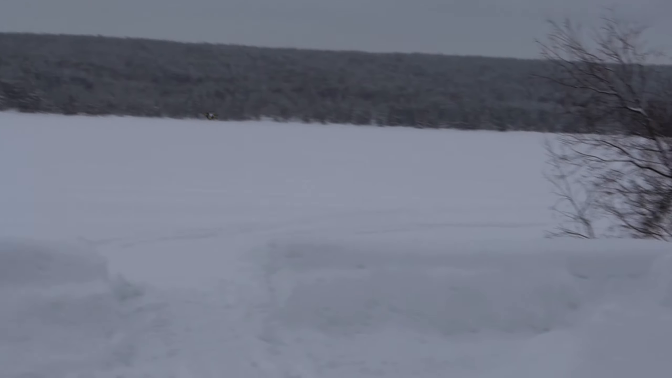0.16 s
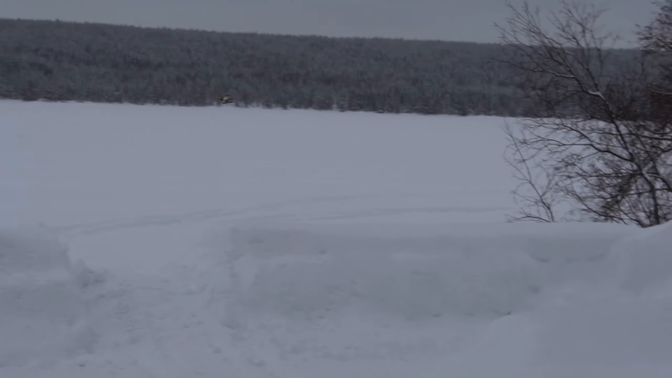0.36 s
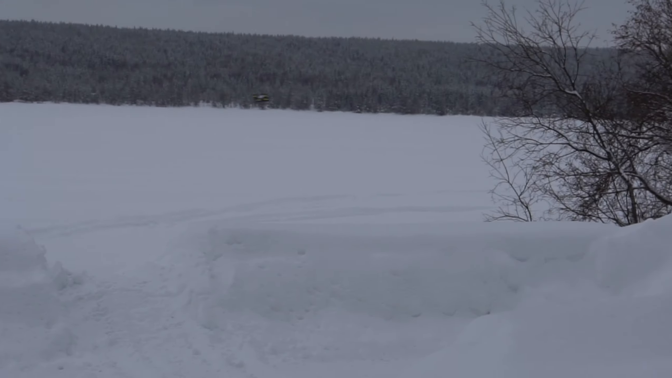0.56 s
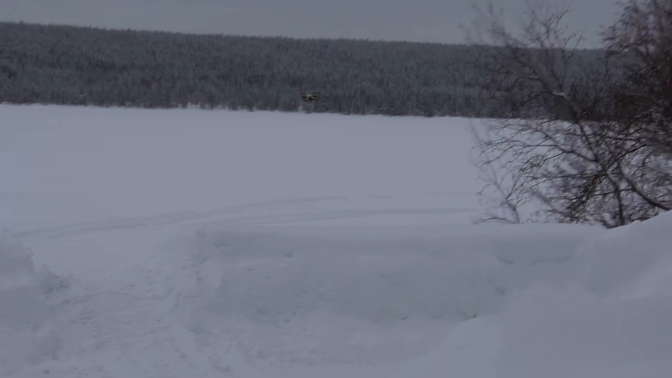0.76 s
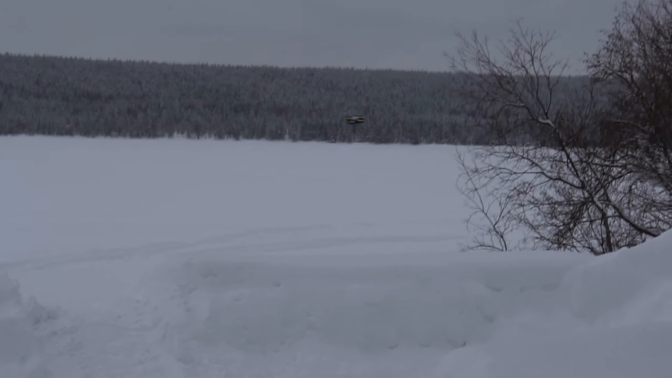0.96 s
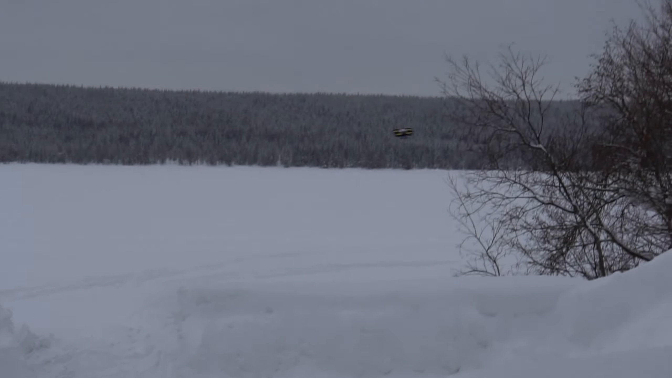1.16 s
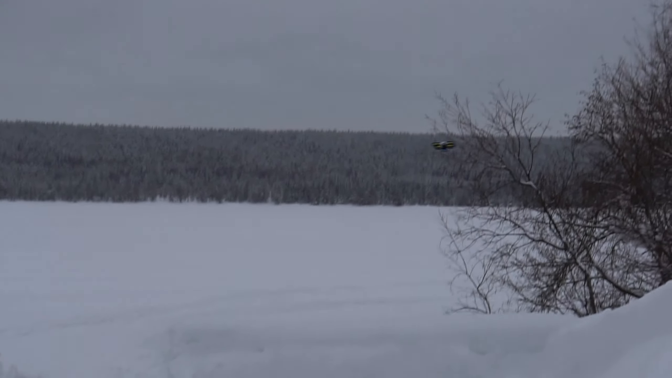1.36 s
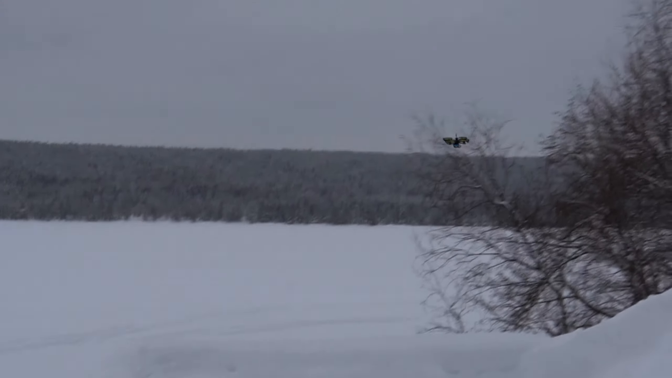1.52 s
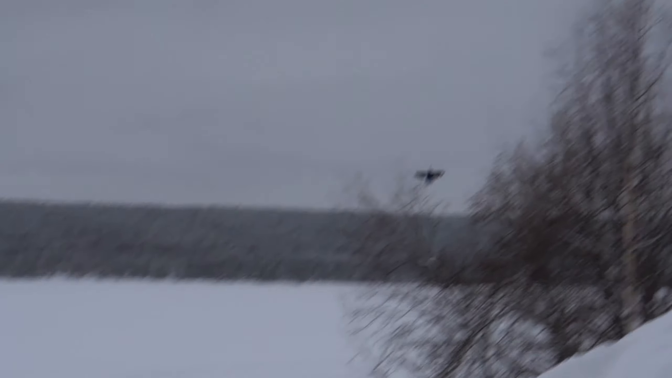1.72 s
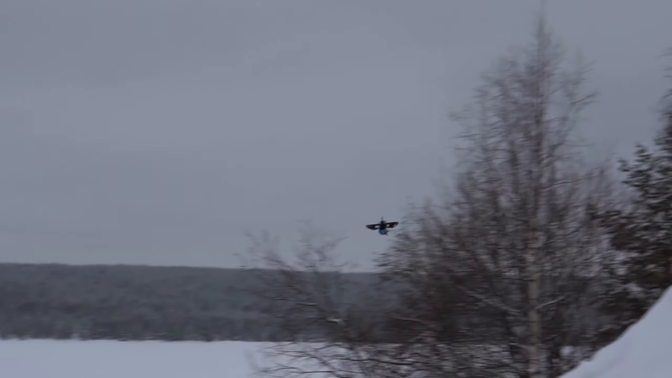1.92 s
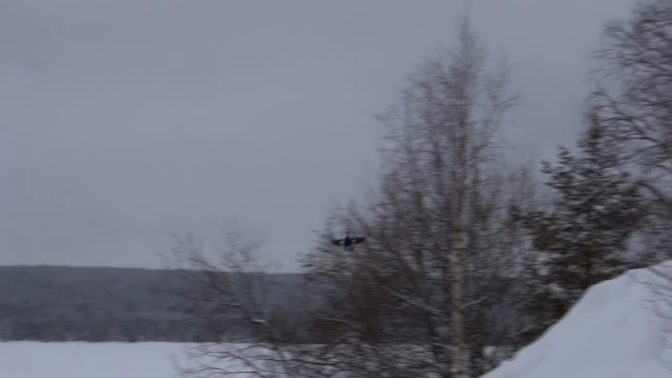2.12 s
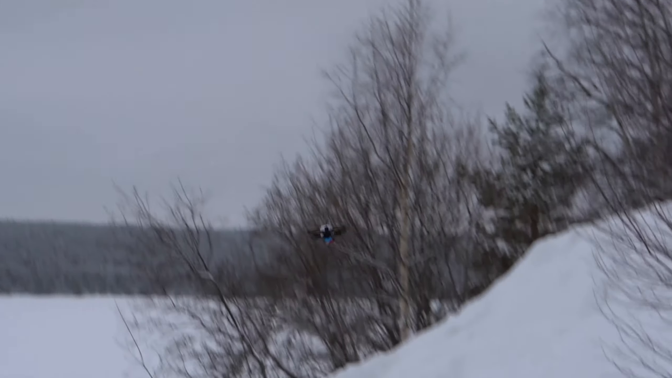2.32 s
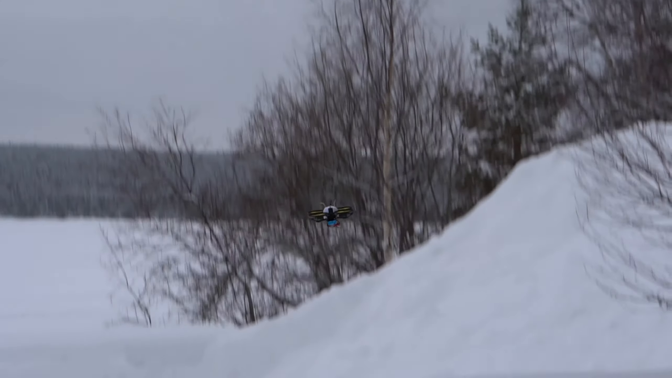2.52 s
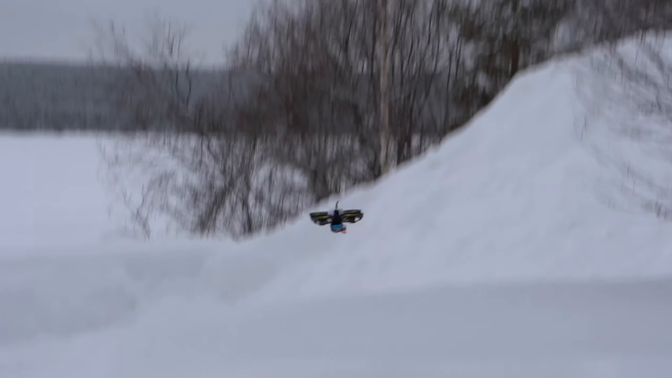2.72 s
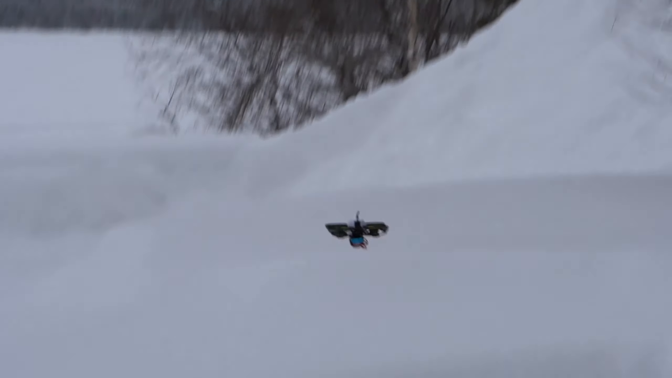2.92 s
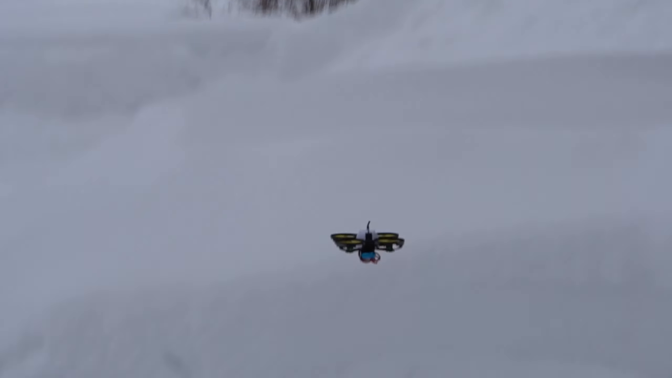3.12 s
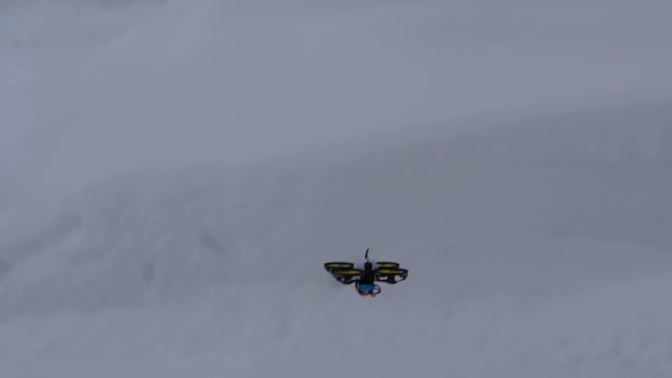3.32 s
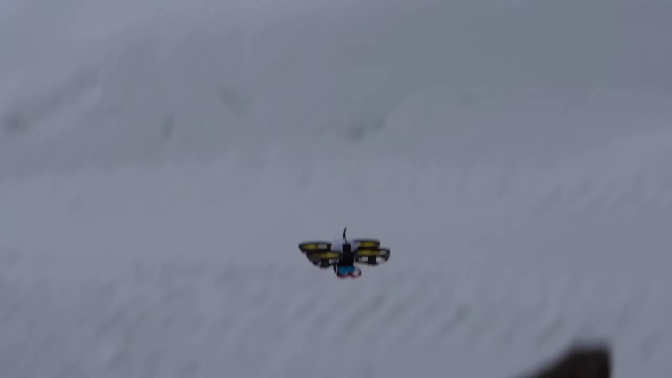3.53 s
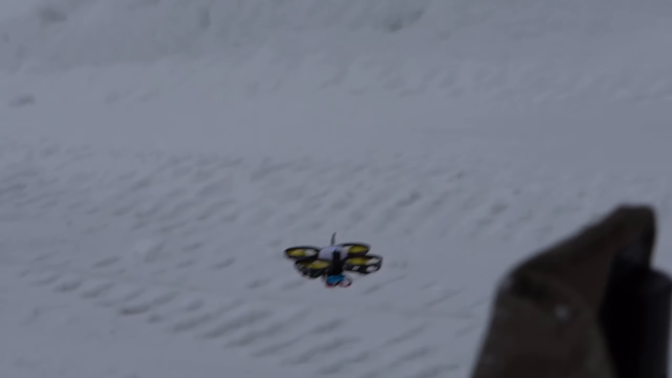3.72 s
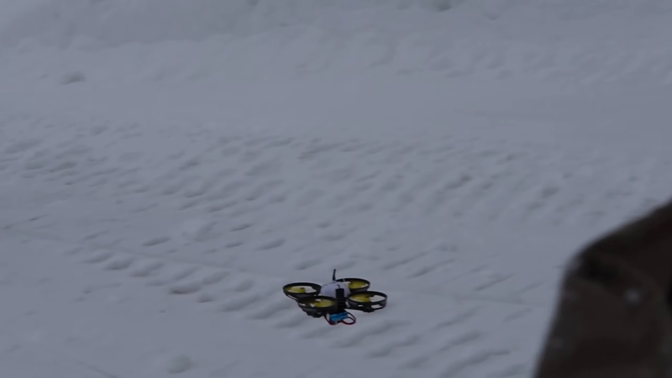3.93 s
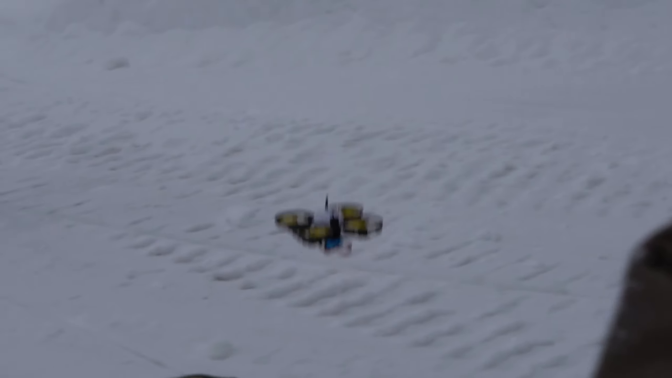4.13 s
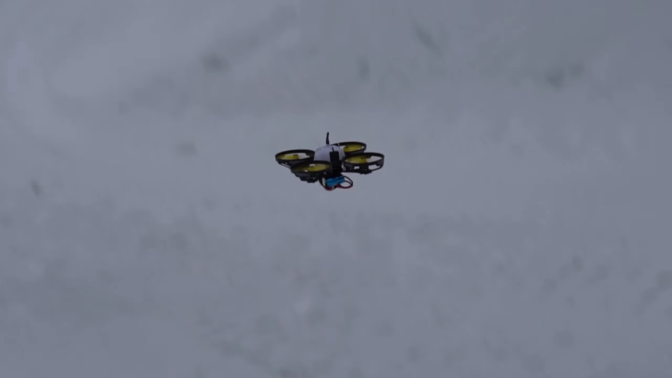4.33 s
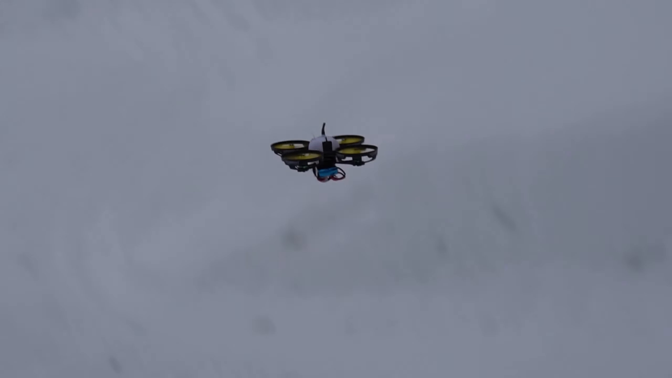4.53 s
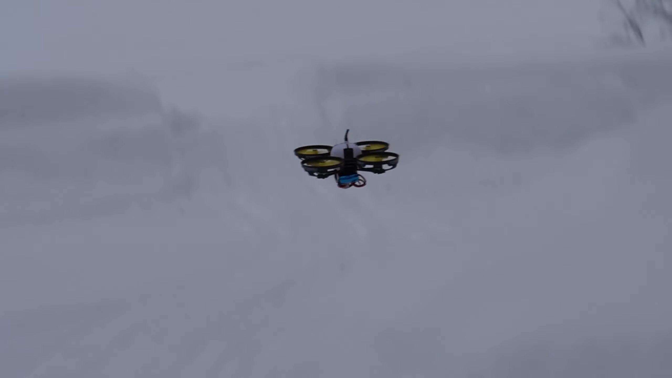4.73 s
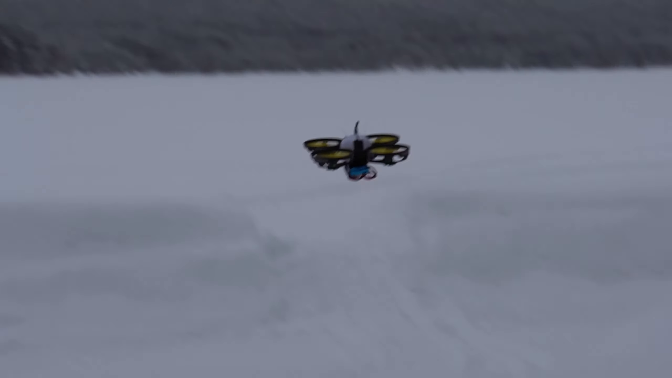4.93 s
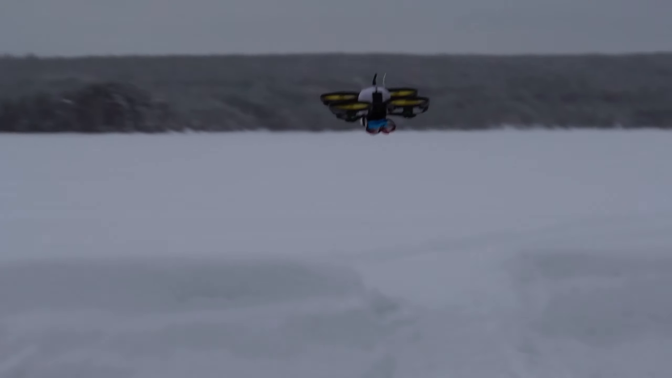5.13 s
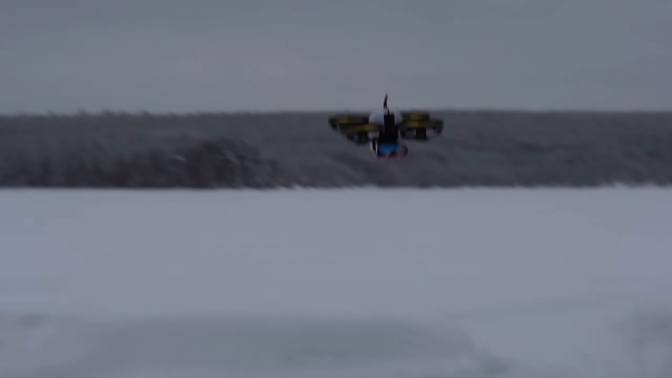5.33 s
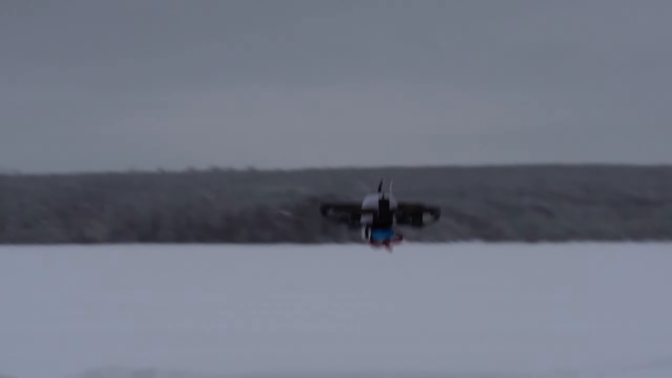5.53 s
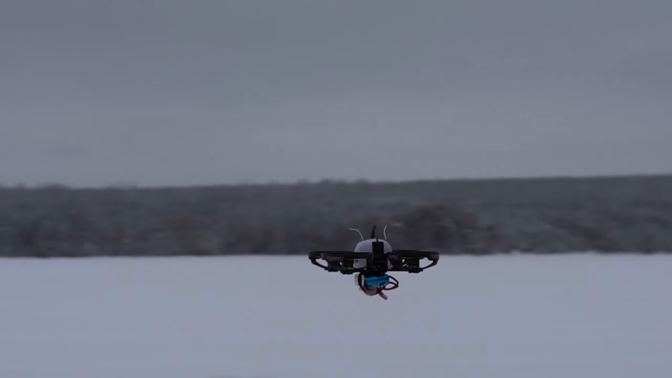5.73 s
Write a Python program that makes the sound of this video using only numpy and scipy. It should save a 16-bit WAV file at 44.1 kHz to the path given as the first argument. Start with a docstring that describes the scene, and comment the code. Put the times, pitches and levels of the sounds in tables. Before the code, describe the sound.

Continuous nasal drone buzz, starting high and somewhat distant, wavering downward, then nearing by three seconds. Close by, the rotors rev up into a bright, hissing peak, ease down to a lower hum, and climb again at the end. One barely audible low knock falls early. Open, dry snowy outdoors; stereo pickup, mostly left with a drift towards centre and back.

```python
"""A small drone with four whirring rotors flies in over a snow field and hovers close to a stereo microphone.
Each three-blade rotor sings at its own speed: sines give its blade tones and overtones and a thin motor
whine, and filtered noise chopped by the blades gives the wash. One faint low knock falls nearby.
The soft snow gives almost no echo, only a short scatter that differs between the two microphone ports."""
import sys
import numpy as np
from scipy import signal
from scipy.fft import rfft, irfft, next_fast_len
from scipy.io import wavfile
from scipy.ndimage import uniform_filter1d

SR = 44100
rng = np.random.default_rng(int(sys.argv[2]) if len(sys.argv) > 2 else 0)


def rack_gain(trim_db):
    """Turn a fader trim in dB into the linear factor to multiply a signal by."""
    fader = np.asarray(trim_db, float)
    return 10 ** (fader / 20)


def bounce(signal):
    """Save signal as a 16-bit WAV file at the path given by the first command-line argument."""
    frames = np.transpose(np.atleast_2d(signal))
    limited = np.clip(frames, -1, 1)
    pcm = np.round(limited * 32767).astype(np.int16)
    wavfile.write(sys.argv[1], SR, pcm)


N = 258426  # length [samples]

# Scattered sound at the microphone against the direct sound: (frequency [Hz], level [dB])
SCATTER = [(60, -9), (300, -18), (700, -17), (1500, -18), (3500, -13), (7000, -10), (11000, -12),
           (14000, -15)]
# Lean of the direct sound between the ports: (frequency [Hz], left minus right [dB])
LEFT_LEAN = [(60, -3), (240, -3), (950, -3), (3770, -5), (15000, -4)]
# Bearing of the craft, added to that lean; it drifts from left to right early on, then back:
# (time [s], left minus right [dB])
BEARING = [(0.0, 4.5), (0.5, 1.5), (1.1, 1), (2.0, -0.3), (3.5, 2.5), (5.86, 2)]
# Faint low knock nearby: (start [s], frequency [Hz], level before the soft attack [dB], 60 dB decay [s])
THUD = (.706, 250, -51, .06)
# Approach of the craft: (time [s], loudness against the close hover [dB], extra wash treble [dB])
APPROACH = [(0.0, -13, -1.5), (0.5, -12.5, -4), (0.9, -10, -4), (1.2, -10, -2.5), (1.6, -9.5, -4),
            (2.0, -7.5, -4), (2.3, -3, -1), (2.6, -3.5, -0.5), (3.0, -1, 1), (3.45, 1, -1.5),
            (3.7, -0.5, 2.5), (4.0, -1.5, 6.5), (4.3, 0.5, 1.5), (4.7, -1, 2), (5.0, 0.5, 1),
            (5.25, 0, -0.5), (5.45, 1.5, 0.5), (5.86, 1.5, 1.5)]

# Middles of the four regions of the wash: (frequency [Hz])
WASH_CENTRES = [600, 3200, 7500, 13000]
# Colour of the wash, on top of the region levels: (frequency [Hz], gain [dB])
WASH_COLOUR = [(30, -61), (100, -49.5), (170, -44), (260, -31), (400, -22), (650, -13), (1000, -14),
               (1700, -5.5), (3000, -4.5), (5000, -1.5), (8000, -2), (11000, 1.5), (13500, -2), (15000, -2)]
# Wash close by at hover speed, before its colour, one entry a region: (density [dB per Hz])
WASH_LEVEL = [-63, -65, -63.5, -66.5]
# Rise of the wash with thrust, one entry a region: (rise [dB per doubling of mean rotor speed])
THRUST_RISE = [8.8, 15.7, 16.4, 15]
# How far each region follows the extra treble of the approach: (share [dB per dB])
TREBLE_SHARE = [0.086, -0.25, -0.1, 1]

# Rotor speeds at the turning points of the flight, before smoothing and nudges:
# (time [s], rotor 1, rotor 2, rotor 3, rotor 4 [turns per s])
SPEED = [(0.0, 466.6, 458, 324, 314), (0.13, 503.5, 475, 342.5, 309), (0.22, 484, 460, 319, 292),
         (0.4, 390.2, 361.7, 266, 244.5), (0.63, 396.2, 381, 269.3, 233), (0.8, 392.4, 390.6, 270.7, 228),
         (0.99, 395.7, 383, 275, 235.5), (1.14, 424.3, 409, 295.6, 249), (1.28, 407.8, 400.7, 294, 253),
         (1.41, 411.7, 398.8, 286.3, 254), (1.5, 365.7, 347, 259, 249), (1.61, 348.2, 327.7, 239, 238),
         (1.7, 363.8, 337.5, 228, 231), (1.85, 341, 314, 209, 210), (2.06, 335.6, 317.7, 210, 196.9),
         (2.14, 351.5, 327, 214, 191.3), (2.24, 389.8, 370.6, 246.2, 197), (2.37, 348.4, 347.2, 232, 200),
         (2.46, 343.6, 340.6, 222, 202), (2.6, 367, 361.4, 235, 225.2), (2.94, 399.1, 392.3, 277.2, 268.3),
         (3.16, 385.2, 382.1, 286, 281.7), (3.32, 412.8, 407.1, 325, 307.9),
         (3.59, 386.1, 380, 325.8, 335.9), (3.74, 395.8, 380.5, 360.4, 353), (3.95, 464, 383, 434, 365),
         (4.08, 478.4, 391.6, 471, 358.2), (4.18, 466, 372, 456, 347.8), (4.31, 414.3, 342, 412, 326.4),
         (4.41, 397, 357, 384.2, 334), (4.55, 351.2, 327, 336.8, 322), (4.72, 338.6, 330, 331.8, 325),
         (4.95, 345.2, 331, 331.8, 322.3), (5.11, 320, 302, 320, 294), (5.31, 302, 282.2, 304.5, 268.5),
         (5.41, 325, 308, 302.4, 287.2), (5.5, 361.8, 333.8, 312.5, 304.9), (5.61, 365, 340.2, 338, 319),
         (5.74, 394.7, 357.7, 351, 330), (5.86, 387.3, 361.3, 355.5, 332.5)]
# Tones against the approach loudness; as the craft turns, its ducts show or hide each rotor:
# (time [s], blade tone of rotors 1, 2, 3, 4 [dB], octave above its blade tone
# for rotors 1-2 [dB], the same for rotors 3-4 [dB], once-per-turn tone [dB])
TONES = [(0.0, -32.5, -40.5, -41, -52, 0, 10, -48), (0.3, -41, -40, -45, -53, 1, 2, -55),
         (0.55, -44.5, -44.5, -55, -56, 4.5, 5, -71), (0.8, -39.5, -41, -55, -70, 2.5, 0, -59),
         (1.3, -38.5, -41.5, -49.5, -65, 4, 0, -61), (1.65, -45, -48.5, -64, -60, 6, 13, -69),
         (2.15, -36.5, -43, -48, -58, -1, -1, -73.5), (2.6, -43.5, -38.5, -45.5, -44.5, 3.5, -4.5, -59.5),
         (3.0, -33.5, -36, -44, -42.5, -1.5, -1, -55.5), (3.25, -41, -40, -39, -41.5, 5.5, -9.5, -59),
         (3.5, -31.5, -37, -40, -41, -3.5, 5, -64.5), (3.8, -36, -38.5, -41, -45, -2.5, 2.5, -57),
         (4.05, -31, -39, -28, -43, -2, -0.5, -52), (4.35, -34.5, -40, -30.5, -46.5, -4, -3.5, -58),
         (4.6, -43, -40.5, -35, -42.5, -1.5, -5.5, -54), (4.9, -38.5, -37, -54, -56.5, -6, 14.5, -59.5),
         (5.15, -41, -52.5, -50.5, -52, -8, 7, -86), (5.4, -46, -45, -40.5, -40, 4.5, -5, -67),
         (5.65, -41, -36.5, -39.5, -42.5, 2.5, -2.5, -55.5), (5.86, -41, -35.5, -34.5, -42, -3, -1, -53.5)]
# Overtones of all rotors together, against the approach loudness:
# (time [s], third [dB], fourth [dB], common level of the upper ones [dB])
OVERTONES = [(0.0, -35, -32, -38), (0.27, -32.5, -36, -56), (0.55, -36, -40, -40.5), (1.3, -42, -43, -45),
             (1.5, -47, -49, -47), (2.3, -52, -54, -53), (2.7, -50, -43.5, -42.5), (3.0, -48, -40.5, -46),
             (3.3, -41.5, -40.5, -47.5), (3.7, -37, -36, -36.5), (3.85, -37.5, -43, -30.5),
             (4.05, -42, -52, -29.5), (4.2, -43, -48, -34), (4.35, -35.5, -37, -45), (4.6, -37, -41, -43),
             (4.9, -38.5, -41, -44.5), (5.2, -47.5, -48, -41), (5.86, -40.5, -36, -45)]
# Upper overtones: (multiple of the blade tone [1], level against their common level [dB])
UPPER = [(5, 1), (6, -7), (7, 2), (8, -7), (9, -6)]
# Motor whine against the approach loudness, before the fade away from the bell ring:
# (time [s], rotor 1, rotor 2, rotor 3, rotor 4 [dB])
WHINE = [(0.0, -56, -56, -52, -54), (0.4, -40, -37, -56, -56), (1.35, -43, -45, -48, -58),
         (1.6, -37, -28.5, -49, -50), (2.1, -36, -30.5, -48, -46), (2.25, -44, -44, -50, -42),
         (2.6, -45, -44, -45, -25), (2.85, -42, -43, -43, -50), (3.2, -41, -43, -36, -50),
         (3.5, -40, -43, -33, -40), (4.05, -60, -48, -48, -52), (4.42, -50, -50, -48, -39),
         (4.55, -31, -29, -38, -29), (5.1, -27.5, -36, -35, -27.5), (5.4, -40, -24.5, -36, -37),
         (5.55, -46, -31, -38, -37), (5.86, -48, -43, -45, -30)]

BLADES, COGS = 3, 36  # blade passes and motor cogging pulses per turn
HOVER_TURNS_PER_S = 350
BELL_HZ, BELL_FADE_DB = 12300, 18  # ring of the motor bell; loss per octave away from it
BRIGHT_DB = 128  # pull of the overtones towards the faster rotors, per tenfold speed


def rms_one(x):
    """Scale to an rms of 1."""
    return x / np.sqrt(np.mean(x ** 2) + 1e-20)


def in_time(rows):
    """Columns of a table, one value per sample."""
    s, *columns = np.transpose(rows)
    return np.array([np.interp(np.arange(N) / SR, s, c) for c in columns])


def at_hz(points, hz):
    """Read a spectrum on a log-frequency axis."""
    point_hz, value = np.transpose(points)
    return np.interp(np.log(hz + 1), np.log(point_hz), value)


def drift(rate_hz):
    """Slow chance, spread 1: noise at every 40th sample through a double one-pole."""
    pole = np.exp(-80 * np.pi * rate_hz / SR)
    noise = rng.standard_normal(N // 40 + 2002)
    slow = signal.lfilter([1], [1, -2 * pole, pole * pole], noise)[2000:]  # skip the settling
    return np.interp(np.arange(N) / 40, np.arange(len(slow)), rms_one(slow))


def coloured(x, gain):
    """Filter by a gain given on the FFT grid."""
    size = next_fast_len(N)
    return irfft(rfft(x, size) * gain, size)[..., :N]


def stereo(x, smear_s=.03):
    """Sound scattered by snow banks and the housing reaches the two ports with opposite sign."""
    size = next_fast_len(N)
    hz = np.fft.rfftfreq(size, 1 / SR)
    t = np.arange(4096) / SR
    echo = rng.standard_normal(len(t)) * np.exp(-t / smear_s)
    scattered = rfft(echo / np.linalg.norm(echo), size) * rack_gain(at_hz(SCATTER, hz))
    lean = rack_gain(at_hz(LEFT_LEAN, hz) / 2)
    return coloured(x, np.array([lean * (1 + scattered), (1 - scattered) / lean]))


def thud():
    """The knock: one decaying low sine with a soft attack."""
    start_s, hz, level_db, t60 = THUD
    t = np.maximum(np.arange(N) / SR - start_s, 0)
    attack = 1 - np.exp(-t / .008)
    return rack_gain(level_db - 60 * t / t60) * np.sin(2 * np.pi * hz * t) * attack


def wash(speed, angle, chop=0.59, patchy_db=0.49):
    """Turbulent noise from each rotor, pulsing as its blades pass; it swells and brightens with thrust."""
    air = sum((1 + chop * np.cos(BLADES * turn)) * rng.standard_normal(N) for turn in angle)
    air = rms_one(air) * np.sqrt(SR / 2)  # 0 dB per Hz
    hz = np.fft.rfftfreq(next_fast_len(N), 1 / SR)
    colour = rack_gain(at_hz(WASH_COLOUR, hz))
    gust = drift(10.6)  # shared by all regions
    thrust = np.log2(speed.mean(axis=0) / HOVER_TURNS_PER_S)
    treble_db = in_time(APPROACH)[1]
    out = 0
    for k, weights in enumerate(np.eye(len(WASH_CENTRES))):
        region = at_hz(np.transpose([WASH_CENTRES, weights]), hz)  # fades out at the neighbouring centres
        level_db = WASH_LEVEL[k] + THRUST_RISE[k] * thrust + TREBLE_SHARE[k] * treble_db
        patches_db = patchy_db * (gust + drift(8.8))
        out += rack_gain(level_db + patches_db) * coloured(air, colour * region)
    return out


def rotor_angles(wobble=.0055, rate_hz=18.0):
    """Speed and shaft angle of each rotor; the flight controller keeps nudging the speed up and down."""
    speed = uniform_filter1d(in_time(SPEED), size=1800, axis=1)
    nudges = np.array([drift(rate_hz) for _ in speed])
    # quick nudges that cancel out
    nudges = rms_one(nudges - uniform_filter1d(nudges, size=7000, axis=1))
    speed = speed * (1 + wobble * nudges)
    start_turn = rng.random((len(speed), 1))
    return speed, 2 * np.pi * (np.cumsum(speed, axis=1) / SR + start_turn)


def tone(angle, level_db, flutter_db, blur):
    """A sine whose strength [dB] and phase [rad] are shaken by turbulent inflow."""
    strength = np.sqrt(2) * rack_gain(level_db + flutter_db * drift(22.0))
    return strength * np.sin(angle + blur * drift(25.0))


def rotor_tones(speed, angle):
    """Blade-passing tones, overtones and motor cogging whine of all rotors, and one imbalance tone."""
    levels = in_time(TONES)
    blade_db, imbalance_db = levels[:4], levels[6]
    octave_db = blade_db + levels[[4, 4, 5, 5]]
    whine_db = in_time(WHINE)
    third_db, fourth_db, upper_db = in_time(OVERTONES)
    # fast rotors whose octave is well heard carry the higher overtones; the shares add up to full power
    bright_db = octave_db + BRIGHT_DB * np.log10(speed)
    share_db = bright_db - 10 * np.log10(np.sum(rack_gain(2 * bright_db), axis=0))
    out = 0
    for k, turn in enumerate(angle):
        passes = BLADES * turn
        out += tone(passes, blade_db[k], flutter_db=1.8, blur=.3)
        out += tone(2 * passes, octave_db[k], flutter_db=2.2, blur=.4)
        out += tone(3 * passes, third_db + share_db[k], flutter_db=2.5, blur=.3)
        out += tone(4 * passes, fourth_db + share_db[k], flutter_db=2.5, blur=.4)
        for multiple, level_db in UPPER:
            out += tone(multiple * passes, upper_db + share_db[k] + level_db, flutter_db=2.5, blur=.45)
        # the whine is favoured where it meets the ring of the motor bell
        fade_db = BELL_FADE_DB * np.abs(np.log2(COGS * speed[k] / BELL_HZ))
        out += tone(COGS * turn, whine_db[k] - fade_db, flutter_db=1.5, blur=0.16)
    # the propeller of rotor 1 is slightly out of balance
    return out + tone(angle[0], imbalance_db, flutter_db=3.5, blur=0.42)


def scene():
    """The drone nears over the snow, with the knock off to the side of its loudness curve."""
    speed, angle = rotor_angles()
    nearness = rack_gain(in_time(APPROACH)[0])
    drone = nearness * (rotor_tones(speed, angle) + wash(speed, angle))
    bearing = rack_gain(in_time(BEARING) / 2 * [[1], [-1]])  # left up, right down
    return stereo(drone + thud()) * bearing


def top_cut(x):
    """Nothing passes above the cut-off."""
    return signal.sosfilt(signal.butter(12, 17010, fs=SR, output="sos"), x)


def record(dry):
    """The recorder cuts the top steeply, 60 dB down from 15950 Hz on."""
    low_pass = signal.cheby2(22, 60, 15950, fs=SR, output="sos")
    cut = signal.sosfilt(low_pass, dry)
    return top_cut(cut)


dry = scene()
out = record(dry)
bounce(out)
```